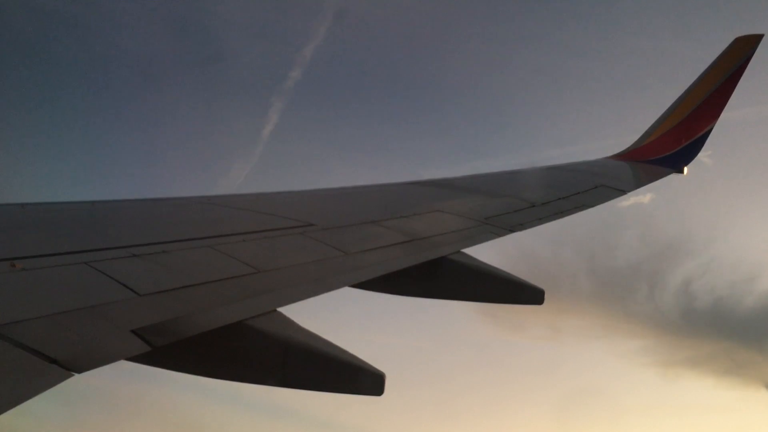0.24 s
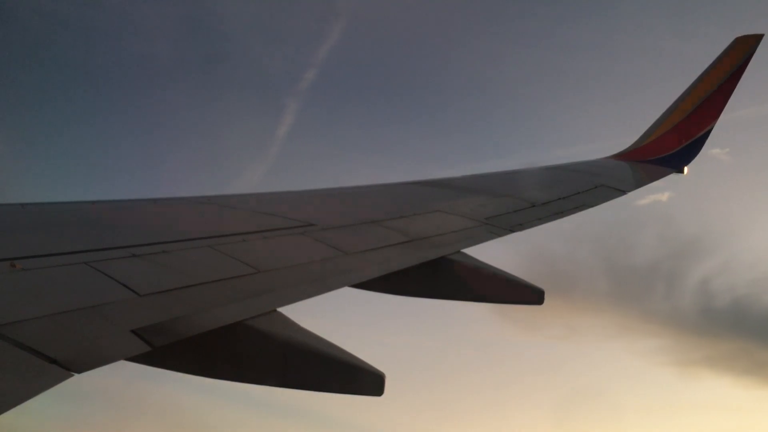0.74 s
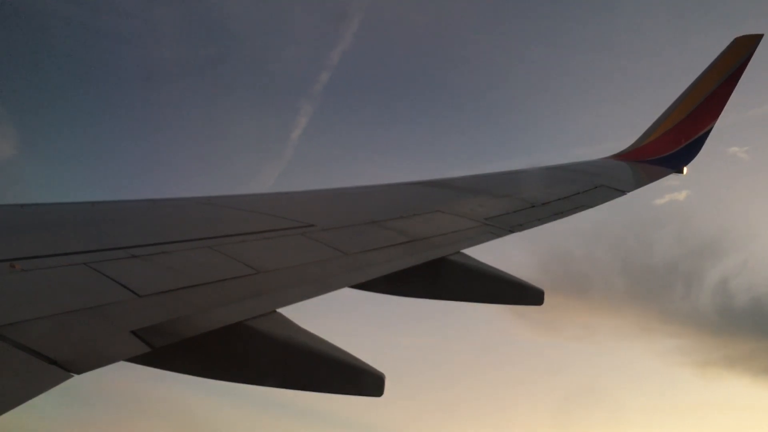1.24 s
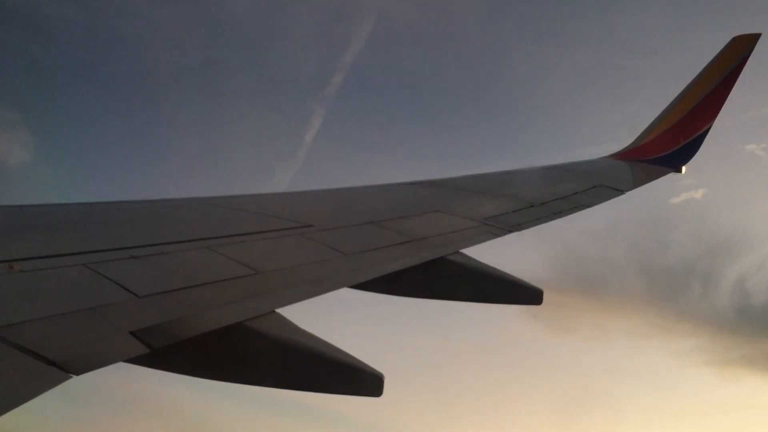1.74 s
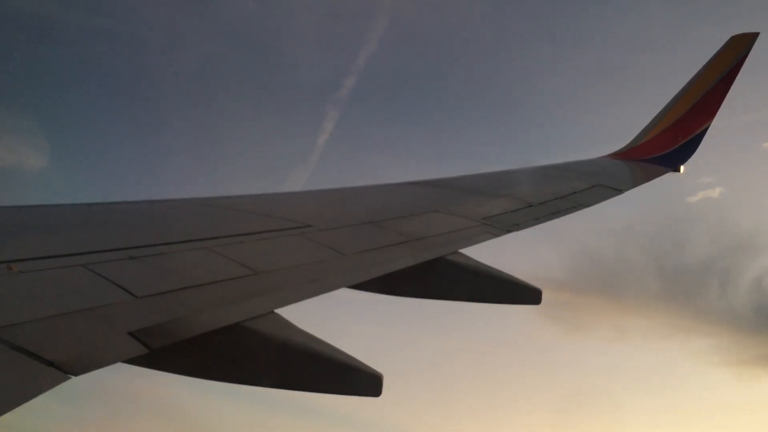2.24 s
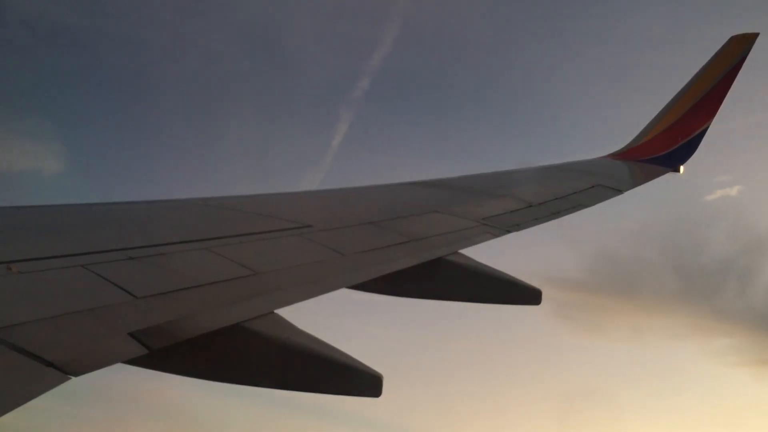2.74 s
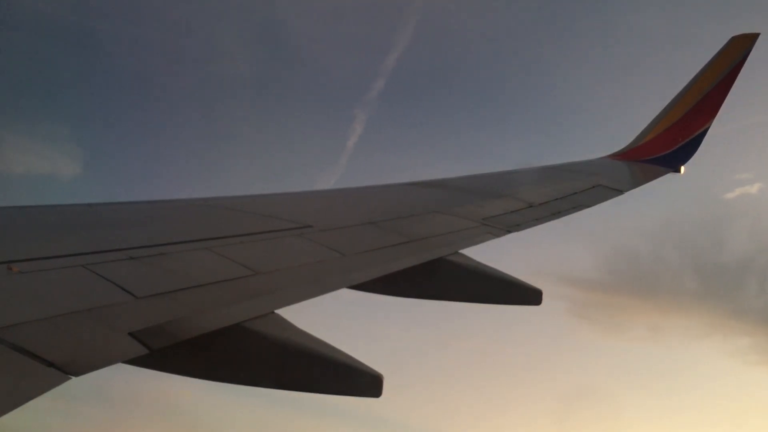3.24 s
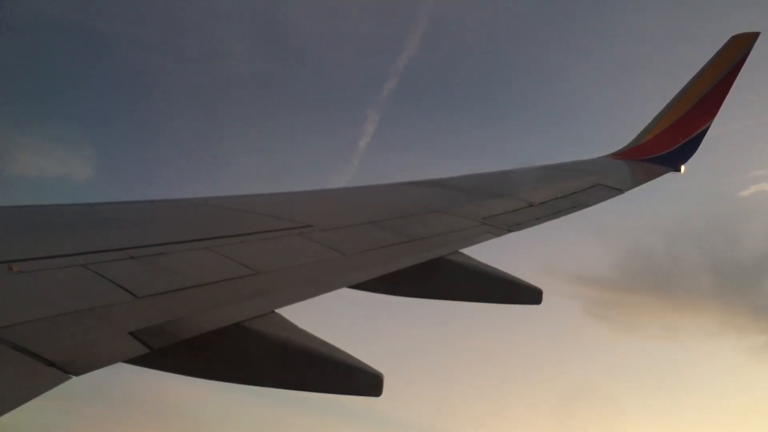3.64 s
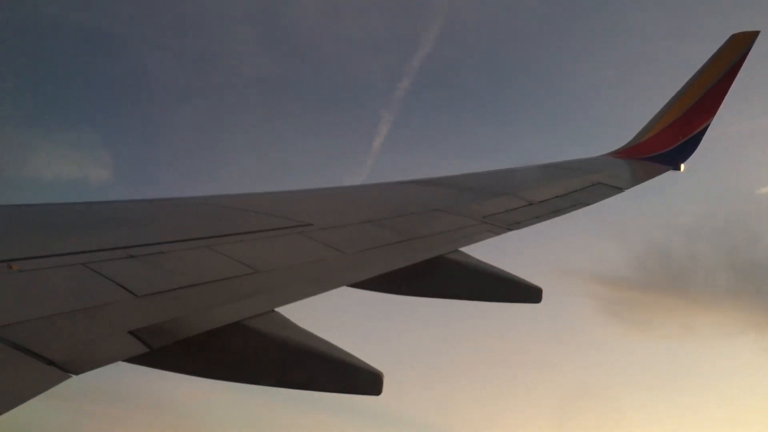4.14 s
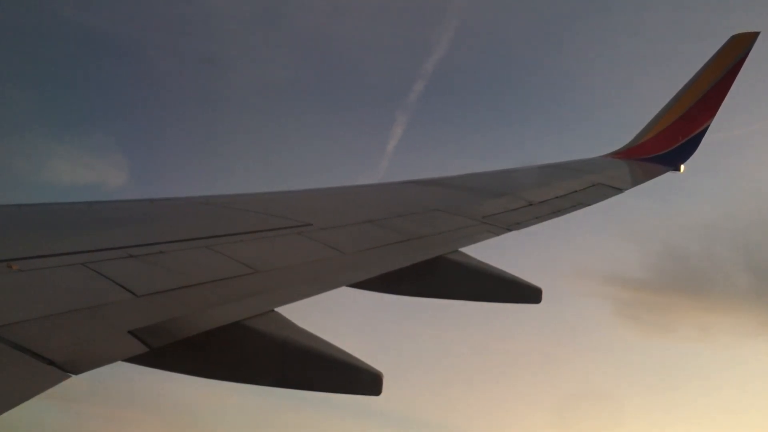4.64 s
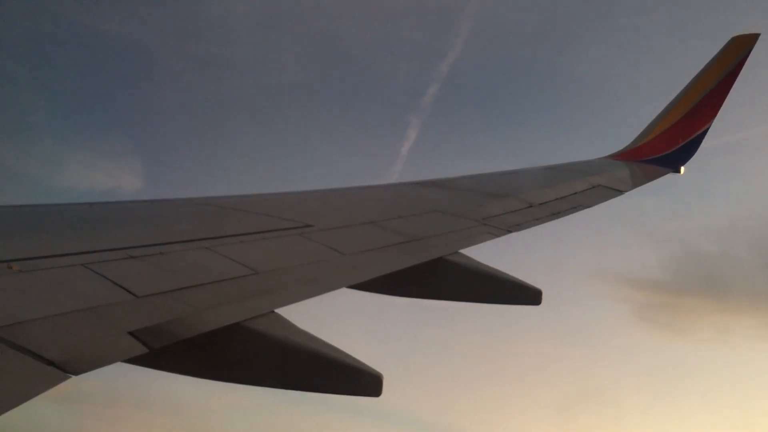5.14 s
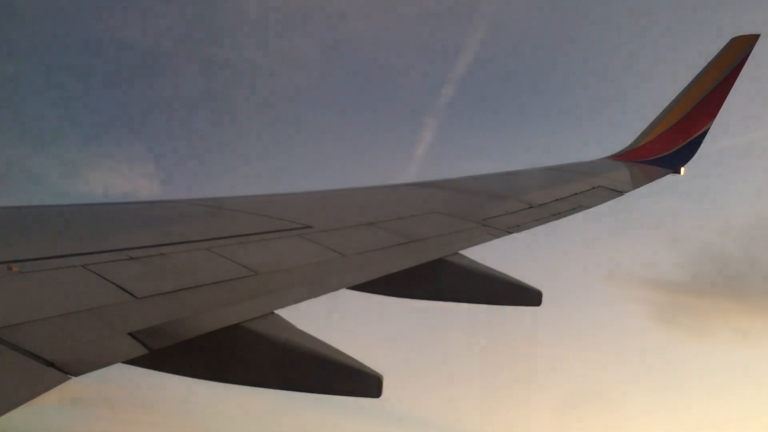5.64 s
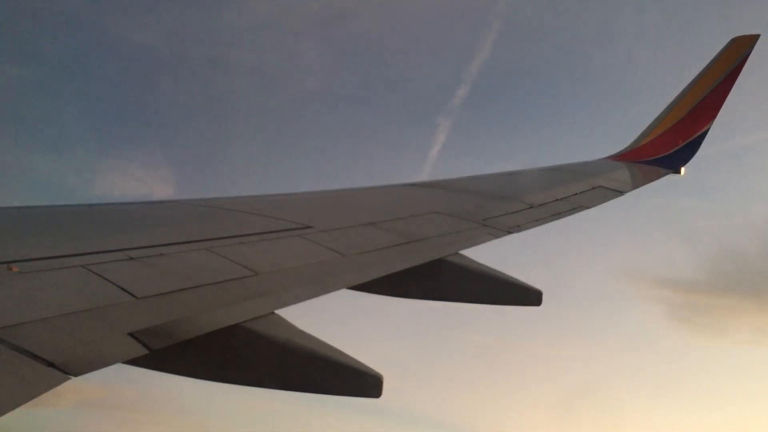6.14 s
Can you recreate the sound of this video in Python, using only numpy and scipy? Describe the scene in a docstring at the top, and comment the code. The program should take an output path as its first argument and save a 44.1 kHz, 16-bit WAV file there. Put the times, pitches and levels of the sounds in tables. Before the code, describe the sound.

A continuous low airplane drone, already running at the start and cut off at the end. Dense bass rumble of airflow and exhaust through the wall blends with a steady fan hum that slowly throbs. Short soft thuds of extra bass swell within it at irregular moments. A thin vent hiss lies far beneath, slightly brighter near the end. Small phone microphone in the cabin, mono.

```python
"""Inside a jet airliner in steady flight, at a window seat over the wing.
Conditioned air hisses from the vents: noise coloured by ducts and nozzles, brighter once in a narrow band.
Exhaust and the airflow along the skin shake the wall panels into a deep roar: noise through resonances.
The two engine fans turn at slightly different speeds, so their sine tones throb about once a second.
The deep part of roar and hum flutters at random and swells in a few brief lumps."""
import sys
import numpy as np
from scipy import signal
from scipy.fft import rfft, irfft
from scipy.io import wavfile
from scipy.ndimage import uniform_filter1d

SR = 44100
rng = np.random.default_rng(int(sys.argv[2]) if len(sys.argv) > 2 else 0)


def generate_wav(sig):
    """Save sig (samples, or channels by samples) to the path in sys.argv[1] as 16-bit PCM at SR."""
    pcm = np.round(np.clip(np.atleast_2d(sig).T, -1, 1) * 32767).astype(np.int16)
    wavfile.write(sys.argv[1], SR, pcm)


N = 281358  # length in samples
t = np.arange(N) / SR  # time in s


def undb(db):
    """Level to amplitude ratio: 20 dB is a factor of ten."""
    return 10 ** (np.asarray(db) / 20)


def level(x, db):
    """Mean-square scaling: set the rms of a sound in dB re full scale."""
    return x * undb(db) / np.sqrt(np.mean(x ** 2))


def walk(rate):
    """Smoothed random process: levels held 1 / rate s and slewed twice; mean 0, spread 1."""
    hold = max(int(SR / rate), 2)
    steps = np.repeat(rng.standard_normal(N // hold + 2), hold)
    slewed = uniform_filter1d(steps, hold)
    smooth = uniform_filter1d(slewed, hold)[:N]
    return (smooth - smooth.mean()) / smooth.std()


def response(hz, slope, resonances):
    """Transfer function: a broad slope with a bell-shaped lift at each resonance."""
    points_hz, points_db = np.transpose(slope)
    db = np.interp(np.log(hz), np.log(points_hz), points_db)
    for centre, width, lift_db in resonances:
        half_widths = 2 * (hz - centre) / width
        db = db + lift_db * .5 ** (half_widths ** 2)
    return undb(db)


def turbulence(slope, resonances, eddy_db, eddy_rate):
    """Turbulent pressure through a sound path: eddies of each size swell their own octave."""
    hz = np.maximum(np.arange(N // 2 + 1) * SR / N, 1)
    pressure = rfft(rng.standard_normal(N)) * response(hz, slope, resonances)
    octave = np.log2(hz / 20)
    out = np.zeros(N)
    for k in range(int(octave[-1]) + 1):
        # neighbouring octaves crossfade along triangles
        weight = np.maximum(1 - abs(octave - k), 0)
        band = irfft(pressure * weight, N)
        out += band * undb(eddy_db * walk(eddy_rate))
    return out


SWELL_PERIOD_S, SWELL_CREST_S = 1.575, .2  # cycle length, moment of a crest


def swell(depth_db):
    """Periodic modulation: the airflow rises and falls gently, depth_db either way."""
    return undb(depth_db * np.cos(2 * np.pi * (t - SWELL_CREST_S) / SWELL_PERIOD_S))


# air leaving the overhead vents, relative spectrum: f/Hz, level/dB
VENT_SPECTRUM = [(500, -9.5), (1800, 3.5), (2700, -2), (3300, 1.5), (4700, -3.5), (6200, -1), (7700, -7.5),
                 (9600, -5.5), (10400, -12), (11100, -7.5), (13200, -11), (15500, -15)]
# duct and nozzle resonances: f/Hz, width/Hz, lift level/dB
DUCT_RESONANCES = [(2344, 170, 5), (3200, 330, 1), (3710, 150, 2), (5950, 700, 0.6), (8300, 400, 1.5)]
VENTS_DB, VENT_SWELL_DB = -59.5, .5  # rms before the swell, swell depth


def vents():
    """Jet noise: conditioned air leaves as a smooth hiss, coloured by duct and nozzle resonance."""
    hiss = turbulence(VENT_SPECTRUM, DUCT_RESONANCES, eddy_db=0.63, eddy_rate=5)
    return level(hiss, VENTS_DB) * swell(VENT_SWELL_DB)


BRIGHT_S, BRIGHT_HALF_S = 5.53, .25  # crest moment, time from crest to 1/e
BRIGHT_HZ, BRIGHT_WIDTH_HZ, BRIGHT_DB = 3430, 500, -67  # band centre, width, rms at the crest


def brightening():
    """Band-limited noise: a narrow band of the hiss rises softly once and sinks back."""
    peak = signal.iirpeak(BRIGHT_HZ, BRIGHT_HZ / BRIGHT_WIDTH_HZ, fs=SR)
    band = signal.lfilter(*peak, rng.standard_normal(N))
    return level(band, BRIGHT_DB) * np.exp(-((t - BRIGHT_S) / BRIGHT_HALF_S) ** 2)


# exhaust and airflow noise let in by the wall, relative spectrum: f/Hz, level/dB
WALL_SPECTRUM = [(18, -26.5), (32, -15.5), (45, -1), (90, -1.4), (120, -3), (240, -7.5), (330, -9),
                 (430, -22.5), (630, -28.5), (720, -34.5), (1200, -42), (1800, -53), (3000, -61),
                 (8000, -90)]
# wall panel and cabin air resonances: f/Hz, width/Hz, lift level/dB
PANEL_RESONANCES = [(161.3, 16.4, 6.5), (186.7, 11.2, 5), (303.6, 57, 8), (388, 38, 5), (527, 28, 1.5),
                    (800, 54, 2.5), (1052, 65, 3.5), (1475, 55, 4)]
ROAR_DB, SKIN_SWELL_DB = -20.5, 0.2  # rms before swell and flutter, swell depth


def roar():
    """Forced vibration: exhaust and boundary layer drum on the wall; the lining absorbs most treble."""
    noise = turbulence(WALL_SPECTRUM, PANEL_RESONANCES, eddy_db=1., eddy_rate=13)
    return level(noise, ROAR_DB) * swell(SKIN_SWELL_DB)


# fan shaft hum through the airframe: turns per s, and rms of the shaft tone before the flutter
NEAR_FAN_HZ, FAR_FAN_HZ = 78.81, 77.66
NEAR_FAN_DB, FAR_FAN_DB = -23.8, -34
THROB_S = .42  # a moment at which the two fans push together
OCTAVE_DB, OCTAVE_SPREAD_DB = -16, 3  # twice-a-turn overtone against the shaft tone: mean, spread


def fans():
    """Beats: each fan's slight unbalance shakes the cabin once a turn; two close tones drift in phase."""
    start = rng.random()  # shared phase in turns
    hum = np.zeros(N)
    for shaft_hz, db in ((NEAR_FAN_HZ, NEAR_FAN_DB), (FAR_FAN_HZ, FAR_FAN_DB)):
        angle = 2 * np.pi * (shaft_hz * (t - THROB_S) + start)
        shaft_tone = level(np.sin(angle), db)
        # only the overtone comes and goes here
        overtone_db = OCTAVE_DB + OCTAVE_SPREAD_DB * walk(rate=3.7)
        overtone = level(np.sin(2 * angle), db) * undb(overtone_db)
        hum += shaft_tone + overtone
    return hum


# the few lumps that stand out of the drone: t/s, lift level/dB
DRONE_LUMPS = [(.71, 7.5), (2.02, 8.5), (2.57, 9.5), (2.97, 5.5), (3.68, 6), (5.36, 8.5)]
LUMP_S = 0.022  # time from the crest of a lump to 1/e of its lift
DEEP_HZ, DEEP_DB = 125, -.5  # upper edge of the deep part, its mean gain
FLUTTER_DB, FLUTTER_PER_S = 1.84, 38  # spread, changes per s


def fluttering(drone):
    """Random amplitude modulation: the deep part flutters unevenly and swells in brief lumps."""
    lowpass = signal.butter(4, DEEP_HZ, fs=SR, output="sos")
    deep = signal.sosfiltfilt(lowpass, drone)
    lump_db = sum(db * np.exp(-((t - s) / LUMP_S) ** 2) for s, db in DRONE_LUMPS)
    flutter_db = FLUTTER_DB * walk(FLUTTER_PER_S)
    return drone - deep + deep * undb(DEEP_DB + flutter_db + lump_db)


def scene():
    """Superposition: hiss, roar and hum add up at the seat."""
    hiss = vents() + brightening()
    drone = fluttering(roar() + fans())
    return (hiss + drone)[None]


TOP_HZ = 15700  # upper edge of the microphone


def record(dry):
    """Band limitation: a mono phone microphone cuts the top; the sound fades in and out over 4 ms."""
    opening = signal.windows.tukey(N, .008 * SR / N)
    lowpass = signal.ellip(12, .1, 80, TOP_HZ, fs=SR, output="sos")
    return signal.sosfilt(lowpass, dry * opening)


dry = scene()
out = record(dry)
generate_wav(out)
```